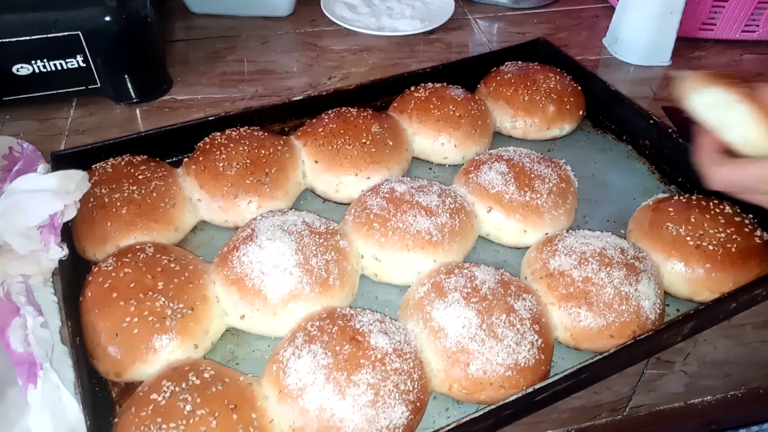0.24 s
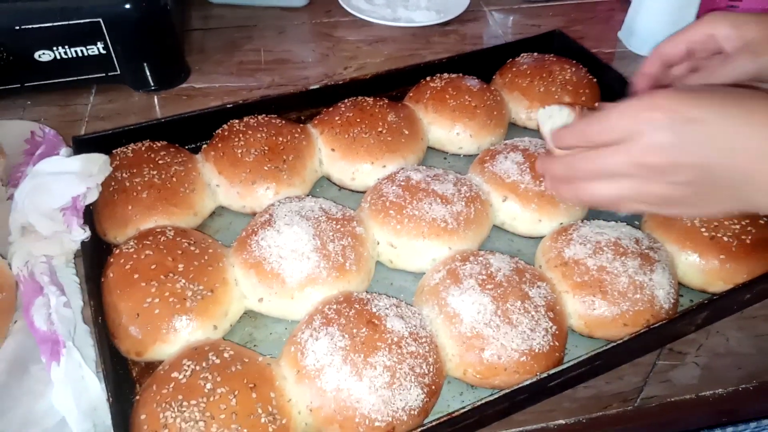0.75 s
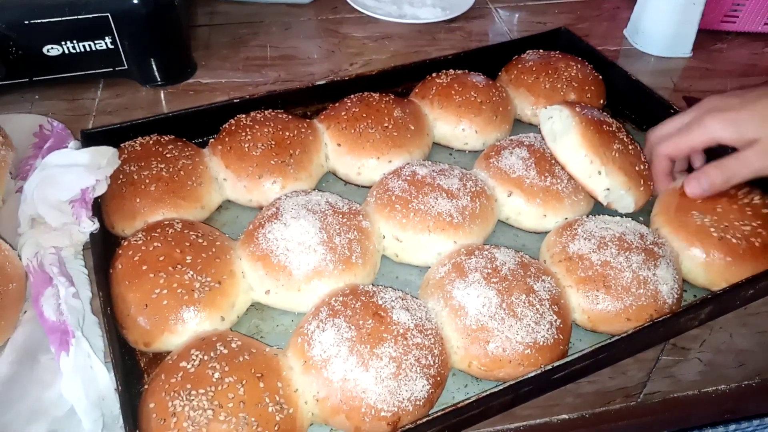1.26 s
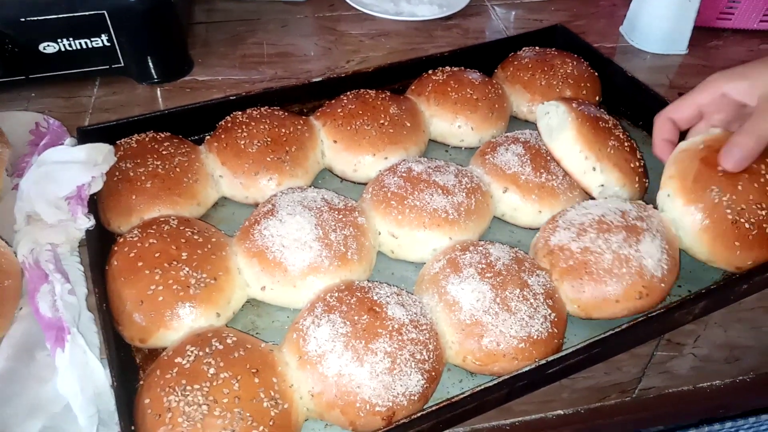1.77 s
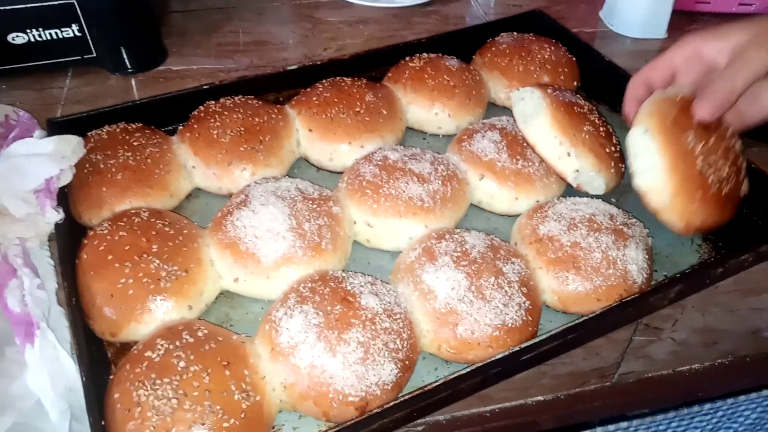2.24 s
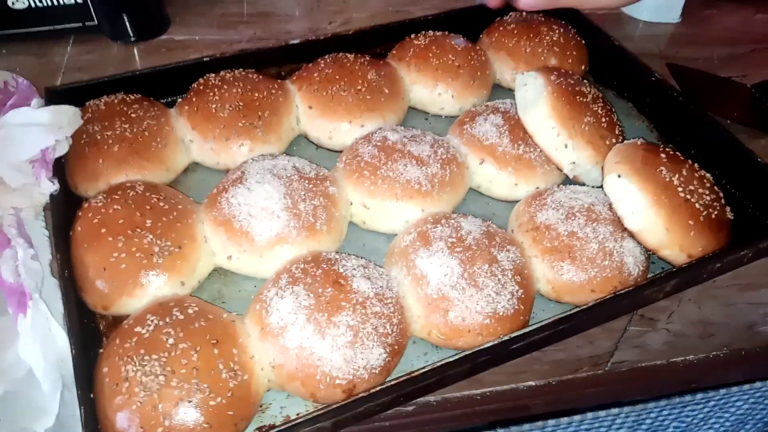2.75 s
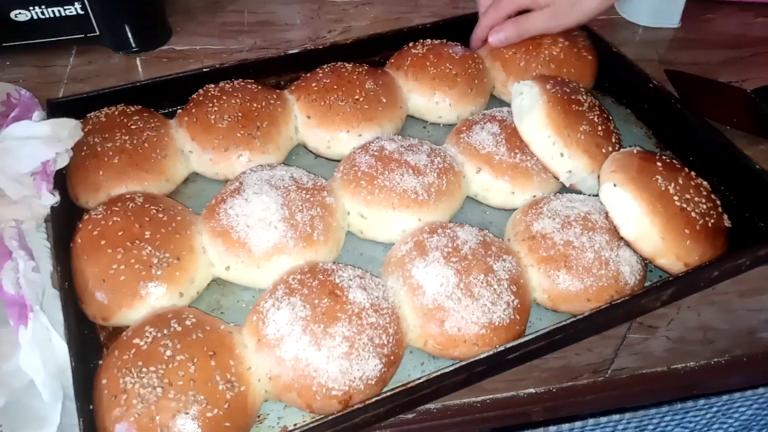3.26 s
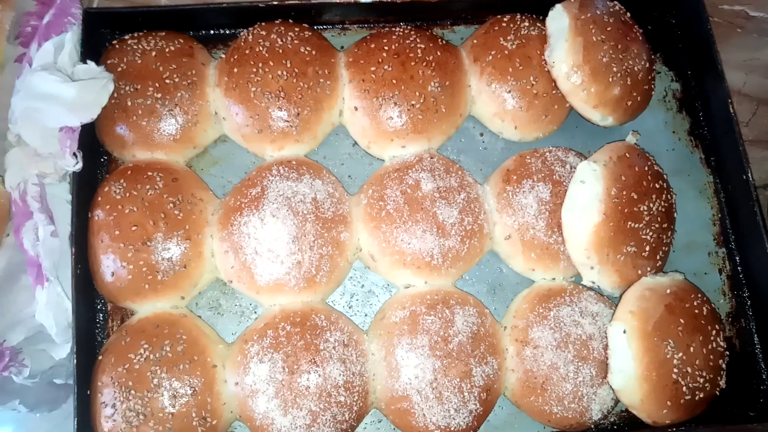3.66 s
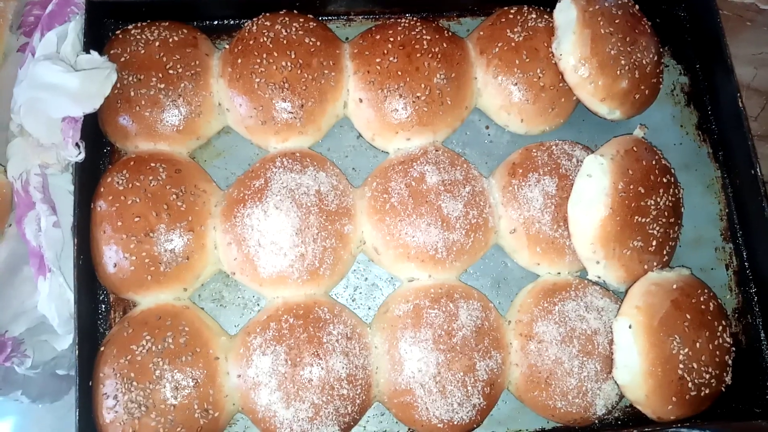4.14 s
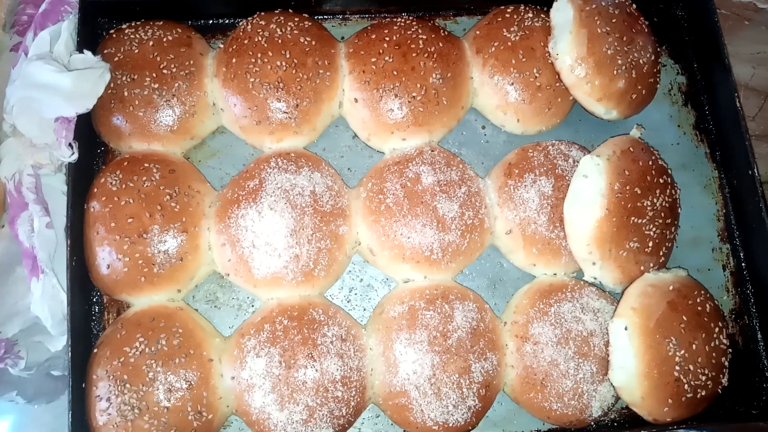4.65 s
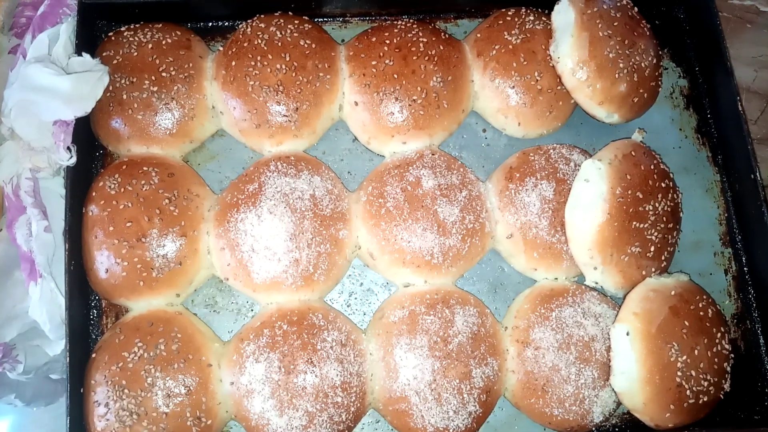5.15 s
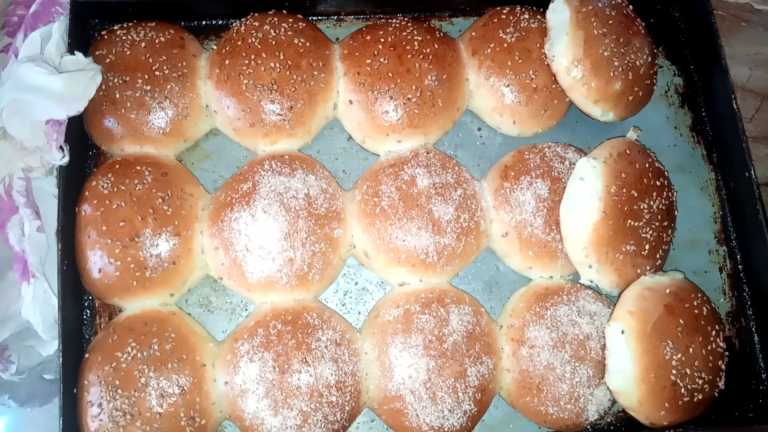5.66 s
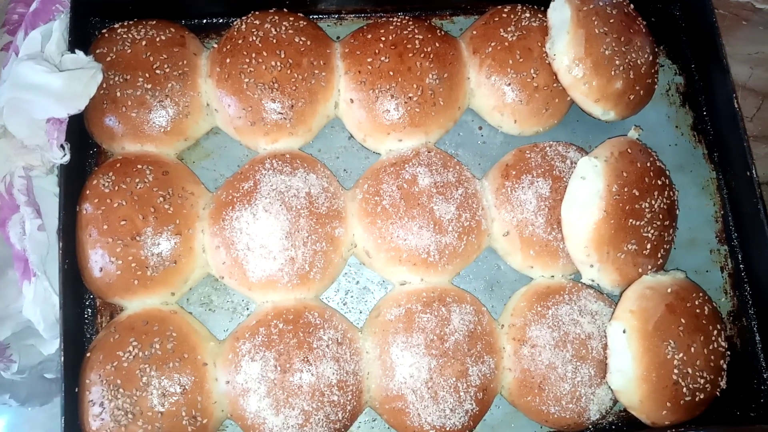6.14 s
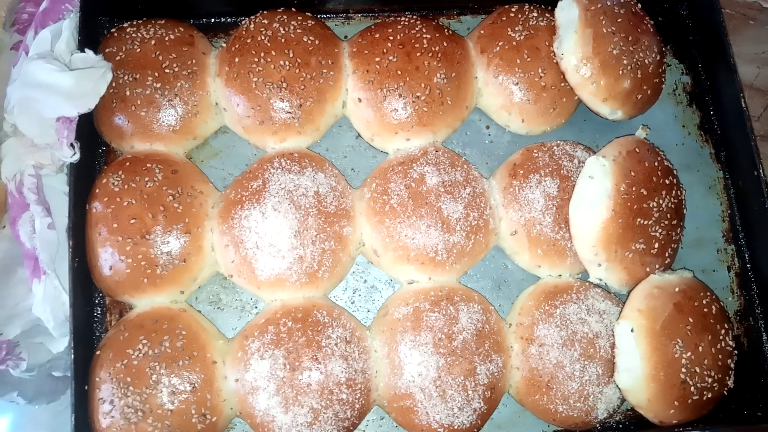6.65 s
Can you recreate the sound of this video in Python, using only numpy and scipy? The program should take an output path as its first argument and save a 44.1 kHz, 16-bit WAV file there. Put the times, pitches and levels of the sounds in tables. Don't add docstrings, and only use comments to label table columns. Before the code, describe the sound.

Close handheld microphone: a burst of bright tray-rim clacks opens, followed by spaced hard knocks, dry crust scrapes, small pings and low worktop thumps over a faint hum and steady insect shimmer. A sparrow warbles. The scene cuts suddenly to a quieter yard with far cheeping, overlapping roosters, faint coos, light air puffs and three clear chirps, all echoing off walls. It cuts back at the very end to a soft boom and warble.

```python
import sys
import numpy as np
from scipy import signal
from scipy.fft import rfft, irfft
from scipy.io import wavfile
from scipy.ndimage import uniform_filter1d

SR = 44100
rng = np.random.default_rng(int(sys.argv[2]) if len(sys.argv) > 2 else 0)


def amplitude_ratio(level_db):
    exponent = np.asarray(level_db, float) / 20
    return 10 ** exponent


def dump(signal):
    limited = np.clip(np.atleast_2d(signal).T, -1, 1)
    pcm = np.round(limited * 32767).astype(np.int16)
    wavfile.write(sys.argv[1], SR, pcm)


N = 304290
TIME = np.arange(N) / SR

CUT_S = (3.358, 6.818)
KITCHEN_SHOT = 1.0 * ((TIME < CUT_S[0]) | (TIME >= CUT_S[1]))
YARD_SHOT = 1 - KITCHEN_SHOT


def unit(x):
    return x / np.sqrt(np.mean(x ** 2))


def band(x, lo_hz, hi_hz, order=2):
    sos = signal.butter(order, [lo_hz, min(hi_hz, SR / 2.1)], "band", fs=SR, output="sos")
    return signal.sosfilt(sos, x)


def hiss(lo_hz, hi_hz, count=N):
    return unit(band(rng.standard_normal(count), lo_hz, hi_hz))


def walk(rate_hz):
    k = int(SR / rate_hz)
    held = np.repeat(rng.standard_normal(N // k + 1), k)
    return unit(uniform_filter1d(uniform_filter1d(held, k), k)[:N])


def tone(hz):
    return np.sin(2 * np.pi * np.cumsum(hz) / SR)


def add(out, s, x):
    i = int(round(s * SR))
    x = x[max(-i, 0):N - i]
    out[max(i, 0):max(i, 0) + len(x)] += x


def tail(t60_s):
    t = TIME[:int(t60_s * SR)]
    x = rng.standard_normal(len(t)) * amplitude_ratio(-60 * t / t60_s)
    return x / np.sqrt(np.sum(x ** 2))


def echo(x, t60_s, wet_db):
    return x + amplitude_ratio(wet_db) * signal.fftconvolve(x, tail(t60_s))[:len(x)]


def swells(table, rise_s, fall_db_s, rest_db=-140):
    gain, t = np.full(N, amplitude_ratio(rest_db)), TIME[:SR]
    for s, hold_s, db in table:
        fall_db = fall_db_s * np.maximum(t - hold_s, 0)
        add(gain, s, np.minimum(t / rise_s, 1) * amplitude_ratio(db - fall_db))
    return gain


def air(spectrum, db):
    edges_hz = (0, 150, 350, 800, 1600, 2800, 5000, 8000, 23000)
    patch_db, patch_per_s = 2.5, 9
    hz, level_db = np.transpose(spectrum)
    f = np.arange(N // 2 + 1) * SR / N + 1
    noise = rfft(rng.standard_normal(N)) * amplitude_ratio(np.interp(np.log(f), np.log(hz), level_db))
    out = np.zeros(N)
    for lo, hi in zip(edges_hz, edges_hz[1:]):
        depth_db = patch_db * (hi < SR / 2)
        out += irfft(noise * (f >= lo) * (f < hi), N) * amplitude_ratio(depth_db * walk(patch_per_s))
    return amplitude_ratio(db) * unit(out)


def cricket():
    note_hz, pulse_hz, kitchen_db, yard_db = 5373, 48.1, -74, -74
    pulse = np.cos(2 * np.pi * np.cumsum(pulse_hz * (1 + 0.019 * walk(12))) / SR)
    note = tone(note_hz * (1 + 0.004 * walk(40)))
    level_db = np.where(KITCHEN_SHOT, kitchen_db, yard_db) + 1.9 * walk(25)
    return amplitude_ratio(level_db) * unit(np.exp(0.6 * pulse) * note)


# (centre [Hz], width [Hz], kitchen level [dB], yard level [dB])
INSECTS = [(3100, 120, -77, -81.5), (3920, 350, -79, -82), (4373, 80, -78, -82.5), (5184, 90, -76.5, -78.5),
           (5360, 200, -81, -86.5), (6600, 61, -90.5, -88.5), (7100, 34, -99, -91.5),
           (7500, 130, -95, -91.5), (9200, 45, -100, -103.5), (10150, 43.4, -103, -99)]


def insects():
    out = np.zeros(N)
    for hz, width_hz, kitchen_db, yard_db in INSECTS:
        level_db = np.where(KITCHEN_SHOT, kitchen_db, yard_db) + 2.0 * walk(13) + 0.78 * walk(1.7)
        out += hiss(hz - width_hz / 2, hz + width_hz / 2) * amplitude_ratio(level_db)
    return out


# (frequency [Hz], density [dB per Hz])
KITCHEN_AIR = [(30, -33.5), (45, -7.5), (65, -19.5), (100, 0.5), (180, -24), (500, -16.5), (900, -23),
               (2500, -22.5), (3000, -14.5), (4600, -17.5), (7400, -26), (8400, -40), (13500, -43),
               (15400, -43.5)]
# (frequency [Hz], density [dB per Hz])
YARD_AIR = [(30, -25), (45, 1), (100, -4.5), (270, -3.5), (600, -4), (900, -28), (2600, -9.5), (3100, 0),
            (4600, -16.5), (5700, -12), (7600, -14.5), (8400, -25), (13500, -29.5), (15400, -32.5)]
# (frequency [Hz], kitchen level [dB], yard level [dB])
HUM = [
    (47.2, -71.5, -92),
    (92.3, -75.5, -84.5),
]


def floor():
    out = KITCHEN_SHOT * air(KITCHEN_AIR, db=-71) + YARD_SHOT * air(YARD_AIR, db=-74)
    out += insects() + cricket()
    for hz, kitchen_db, yard_db in HUM:
        level_db = np.where(KITCHEN_SHOT, kitchen_db, yard_db) + 0.55 * walk(4.7)
        out += amplitude_ratio(level_db) * tone(hz * (1 + 0.0084 * walk(4.7)))
    return out


def whistle(hz, gain, rough, quaver):
    flutter, drift = hiss(30, 290, len(hz)), hiss(30, 290, len(hz))
    phase = 2 * np.pi * np.cumsum(hz * (1 + quaver * drift)) / SR
    return gain * (1 + rough * flutter) * (np.sin(phase) + 0.006 * np.sin(2 * phase))


def lop(shots):
    return shots[np.searchsorted(CUT_S, TIME), np.arange(N)]


# (start [s], start pitch [Hz], top [s], top pitch [Hz], level [dB])
SYLLABLES = [
    (0, 3700, 0.010, 4780, -7),
    (0.047, 3400, 0.055, 4350, 0),
    (0.064, 3050, 0.088, 4000, 1),
    (0.098, 3250, 0.105, 3850, -1),
    (0.114, 2700, .136, 3150, -4),
]


def warble():
    valley_db = -15
    # (time [s], pitch [Hz], level [dB])
    turns = [(0.039, 4300, -1), (0.16, 2250, 2 * valley_db)]
    for start, start_hz, top, top_hz, db in SYLLABLES:
        turns.append((start, start_hz, valley_db if start else 4 * valley_db))
        turns.append((top, top_hz, db))
    return np.transpose(sorted(turns))


# (time [s], level [dB], early-part gain [dB], yard echo [dB], near-wall slap [dB])
WARBLES = [
    (-.057, -39, -1, -9.5, -7.5),
    (2.283, -40, 3.5, -6.5, -8),
    (4.370, -39, -17, -3.5, -13),
    (5.170, -40.5, -6.5, -4, -15.5),
    (6.752, -37.5, -10, -3, -11.5),
]


def warbles():
    shots = np.zeros((3, N))
    turn_s, turn_hz, turn_db = warble()
    t = TIME[:int(turn_s[-1] * SR)]
    hz = uniform_filter1d(np.interp(t, turn_s, turn_hz), size=160)
    lag_s = 0.004 * (t > 0.039)
    shape_db = np.interp(t - lag_s, turn_s, turn_db)
    early = np.clip(1.15 - t / 0.035, 0, 1)
    for s, db, early_db, wet_db, slap_db in WARBLES:
        x = whistle(hz, amplitude_ratio(db + shape_db + early_db * early), rough=0.4, quaver=0.0047)
        x = np.pad(x, (0, 30000))
        x = x + amplitude_ratio(slap_db) * np.roll(x, int(0.035 * SR))
        add(shots[np.searchsorted(CUT_S, s + 0.1)], s, echo(x, 0.57, wet_db))
    return lop(shots)


def crumbs(lo_hz, hi_hz, slip_db):
    ticks_per_s, spread_db = 900, 3.5
    size = amplitude_ratio(spread_db * np.minimum(rng.exponential(size=N), 2) + slip_db)
    ticks = (rng.random(N) < ticks_per_s / SR) * rng.standard_normal(N) * size
    return unit(band(echo(ticks, 0.1, wet_db=3), lo_hz, hi_hz))


# (time [s], hold [s], level [dB], treble [dB])
SCRAPES = [(0.0, 0.01, -47.5, -38.5), (0.382, 0.053, -71, -6.5), (1.021, .2, -60.5, -31),
           (1.294, 0.082, -68.5, -19), (1.399, 0.077, -67.5, -28), (1.501, 0.02, -72, -13),
           (2.379, 0.011, -42.5, -18.5), (2.465, 0.049, -64, -40), (2.813, 0.031, -69.5, -35),
           (2.89, 0.034, -73, -29.5), (3.021, 0.039, -61, -29), (3.143, 0.18, -66.5, -22),
           (3.328, .03, -68.5, -2), (6.813, 0.059, -59, -43)]


def scrapes():
    rise_s, fall_db_s = 0.0067, 260.5
    slip_db = 1.2 * walk(60)
    body = crumbs(1300, 2300, slip_db)
    body += 0.94 * crumbs(1780, 2830, slip_db)
    body += 1.29 * crumbs(3106, 5280, slip_db)
    low, top = crumbs(370, 1100, slip_db), crumbs(5200, 11000, slip_db)
    drag = swells([(s, hold, db) for s, hold, db, _ in SCRAPES], rise_s, fall_db_s)
    grit = swells([(s, hold, db + treble_db) for s, hold, db, treble_db in SCRAPES], rise_s, fall_db_s)
    return drag * (0.48 * body + 0.25 * low) + grit * top


# (time [s], length [s], start pitch [Hz], end pitch [Hz], level [dB])
NOTES = [(4.065, 0.16, 3050, 4100, -58), (4.07, 0.096, 3050, 3300, -61.5), (4.185, 0.07, 4050, 4100, -58.5),
         (5.305, 0.06, 2500, 2050, -70), (.088, 0.011, 6560, 6100, -59), (0.26, 0.021, 3700, 4230, -57),
         (1.462, 0.11, 6300, 5600, -60.5), (3.085, 0.086, 6200, 6000, -60), (4.895, 0.13, 6400, 5600, -60),
         (5.295, 0.099, 4700, 3300, -57.5), (5.26, 0.11, 1200, 1100, -80), (0.84, 0.16, 1900, 2150, -83),
         (5.42, 0.039, 770, 650, -82), (6.70, 0.11, 7000, 5700, -64), (6.76, 0.072, 1400, 1380, -74.5)]
# (time [s], level [dB])
CHIRPS = [
    (5.535, -51.5),
    (5.812, -53.5),
    (6.088, -53),
]
# (delay [s], length [s], start pitch [Hz], end pitch [Hz], level [dB])
CHIRP_PARTS = [
    (0, .04, 3200, 4220, -5.5),
    (.018, .045, 4150, 4436, -3.5),
    (.056, .05, 4050, 3300, -0.5),
]
# (time [s], length [s], start pitch [Hz], end pitch [Hz], level [dB])
FAR_NOTES = [
    (3.33, 0.06, 3920, 3005, -67),
    (3.549, 0.12, 4335, 2647, -65),
    (3.709, 0.071, 4300, 4560, -68),
    (3.723, 0.098, 5880, 6150, -70.5),
    (3.768, 0.088, 7330, 7100, -80.5),
    (3.811, .088, 4240, 2985, -63),
    (3.998, .069, 6520, 5580, -77),
    (5.497, 0.044, 4430, 6030, -81.5),
    (5.782, 0.066, 4455, 5696, -80),
]
# (pitch quaver [0-1], leaf scatter [dB])
BLUR = [
    (.018, 2),
    (.045, 11),
]


def bird_notes():
    yard = np.zeros((3, N))
    near = list(NOTES)
    for s, db in CHIRPS:
        near += [(s + lag, length, a, c, db + part_db) for lag, length, a, c, part_db in CHIRP_PARTS]
    for table, (quaver, leaves_db) in zip((near, FAR_NOTES), BLUR):
        for s, length_s, start_hz, end_hz, db in table:
            u = np.arange(int(length_s * SR)) / (length_s * SR)
            arch = np.sin(np.pi * u)
            hz = (start_hz + (end_hz - start_hz) * u) * (1 + 0.035 * arch)
            x = whistle(hz, amplitude_ratio(db) * arch ** 0.8, 0.42, quaver)
            x = echo(np.pad(x, (0, 5000)), 0.11, leaves_db)
            add(yard[np.searchsorted(CUT_S, s + length_s / 2)], s, x)
    return lop(np.array([echo(shot, 0.87, -5.5) for shot in yard]))


def blows(table, bands, modes, ring_db, crack_db, crack_s, snap_db, late_db, late_t60_s):
    out, t = np.zeros(N), TIME[:30000]
    hz, mode_db, mode_t60 = np.array(modes).T[:, :, None]
    impulse = 1.0 * (t == 0)
    for s, db, a_db, b_db, c_db, t60_s in table:
        chance = rng.standard_normal((2, len(hz), 1))
        fade_db = -60 * t / np.minimum(mode_t60, t60_s)
        ring = amplitude_ratio(ring_db + mode_db + 1.5 * chance[0] + fade_db)
        ring = ring * np.sin(2 * np.pi * hz * (1 + 0.0025 * chance[1]) * t)
        levels_db = (0, a_db, b_db, c_db, c_db - 13)
        for (lo, hi, slow), rel_db in zip(bands, levels_db):
            shape = amplitude_ratio(crack_db) * np.exp(-t / crack_s)
            shape = shape + amplitude_ratio(-60 * t / (t60_s * slow)) + amplitude_ratio(late_db - 60 * t / late_t60_s)
            rattle = shape * unit(band(rng.standard_normal(len(t)), lo, hi, order=3))
            rattle = band(rattle, lo / 1.3, hi * 1.6)
            snap = band(impulse, lo, hi, order=3)
            snap = amplitude_ratio(snap_db - 0.3 * rel_db) * snap / snap.max()
            inside = (hz >= lo) & (hz < hi)
            hit = rattle + snap + (inside * ring).sum(axis=0)
            add(out, s, amplitude_ratio(db - 13.0 + rel_db) * hit)
    return out


# (time [s], peak [dB], low-mid [dB], treble [dB], T60 [s])
CLACKS = [
    (0.1039, -17, -11.5, 0, 0.26),
    (0.108, -30, -20, 2.5, 0.1),
    (0.1150, -28.5, -23, 3, 0.11),
    (0.1420, -19.5, 0.5, -6, 0.21),
    (.1550, -24.5, -7.5, 0, 0.14),
    (2.6221, -57, -20, 3, 0.11),
    (3.358, -47, -9, -10, 0.3),
]
# (frequency [Hz], level [dB], T60 [s])
RIM = [(1079, 1, 0.24), (1250, 3.5, 0.22), (1570, 1, 0.3), (2350, -0.5, 0.2), (2830, 3.5, 0.2),
       (3015, 6, 0.19), (4090, 2, 0.24), (4390, 0, 0.27), (4700, -1, 0.18), (5340, -4, 0.13),
       (5760, -1.5, 0.11), (5830, 0.5, 0.16), (6520, 4, 0.15), (6700, 2.5, 0.15)]


def clacks():
    table = [(s, db, low, top, -11.5 + 1.9 * top, t60) for s, db, low, top, t60 in CLACKS]
    bands = [(3700, 4630, 0.93), (1030, 3900, 1.32), (5210, 7480, 1.01), (7800, 11300, 0.61),
             (12000, 15700, 0.75)]
    out = blows(table, bands, RIM, ring_db=-7.0, crack_db=5.0, crack_s=0.0014, snap_db=11.0,
                late_db=-28.5, late_t60_s=0.51)
    return band(out, 620, 20000)


# (time [s], peak [dB], bass [dB], mid-treble [dB], treble [dB])
KNOCKS = [
    (0.109, -47.5, 4.5, -18.5, -39),
    (0.448, -27, -3.5, -4.5, -21),
    (0.554, -55, 1, 6, -8),
    (1.018, -43.5, 2.5, -1.5, -34),
    (1.409, -52, -24.5, -2, -22),
    (2.055, -31, -2, -13.5, -52),
    (2.390, -26.5, -4, -5.5, -22.5),
    (2.893, -53, -32, -0.5, -27.5),
    (3.014, -41, -12.5, -5.5, -36.5),
]
KNOCK_T60_S = [0.089, 0.23, .07, 0.11, 0.087, 0.18, 0.23, 0.086, 0.18]
# (time [s], peak [dB], bass [dB], mid-treble [dB], treble [dB])
CRUST_SNAPS = [(1.043, -50, -27, -2, -16), (1.075, -56, -30, 2, -17), (1.107, -58.5, -30, 9, -14),
               (1.124, -64, -30, -1, -12), (1.16, -61, -30, 14, -6), (1.19, -65, -30, 8, -5),
               (1.31, -64, -30, 10, -9), (1.51, -66, -30, 11, -6), (.523, -60, -30, 4, -14),
               (.6, -66.5, -30, 7, 0), (2.04, -61, -10, -4, -30), (.905, -62, -29, 1, -19.5),
               (2.379, -52, -13, 4, -24)]
# (frequency [Hz], level [dB], T60 [s])
SHEET = [(376.3, -1, 0.84), (462.5, -7, 0.23), (860, 2.5, 0.14), (1516, 5, 0.26), (1830, 4.5, 0.32),
         (1960, 2, 0.78), (1357, 3, 0.11), (2795, 9, 0.54), (3250, 15.5, 0.12), (3745, 4, 0.59)]


def knocks():
    table = [(*row, t60_s) for row, t60_s in zip(KNOCKS, KNOCK_T60_S)]
    table += [(*row, 0.11) for row in CRUST_SNAPS]
    bands = [(870, 2330, 0.75), (150, 846, 1.09), (2290, 5950, 1.01), (5550, 19000, 0.6)]
    return blows(table, bands, SHEET, ring_db=-16.0, crack_db=2.8, crack_s=0.0027, snap_db=5.5,
                 late_db=-28.0, late_t60_s=0.41)


# (time [s], peak [dB], frequency [Hz], swell [s], T60 [s])
BOOMS = [(0.12, -45.5, 78.2, 0.028, 0.47), (0.458, -40, 79, 0.026, 0.4), (1.022, -49, 344, 0.0094, 0.18),
         (1.182, -57, 92.3, 0.029, 0.31), (1.859, -50.5, 271, 0.03, 0.19), (1.91, -48, 126.6, 0.049, 0.4),
         (2.056, -43.5, 302, 0.0024, 0.14), (2.071, -43.5, 79.3, 0.04, 0.28),
         (2.39, -48, 79.6, 0.028, 0.38), (2.411, -42.5, 144.7, 0.015, 0.25),
         (3.03, -58.5, 150, 0.016, 0.27), (6.817, -52, 98, 0.0062, 0.49)]


def booms():
    out, t = np.zeros(N), TIME[:30000]
    for s, db, hz, swell_s, t60_s in BOOMS:
        gain = amplitude_ratio(db - 60 * t / t60_s) * (1 - np.exp(-t / swell_s))
        add(out, s, gain * np.sin(2 * np.pi * hz * t))
    return out


# (time [s], hold [s], level [dB])
RUMBLE = [
    (.13, 0.053, -60),
    (.45, 0.035, -55),
    (.77, 0.019, -81),
    (1.02, 0.041, -65),
    (1.19, 0.028, -71.5),
    (1.4, 0.03, -72.5),
    (1.85, 0.15, -68),
    (2.055, 0.0092, -52.5),
    (2.385, 0.053, -67),
    (3.02, 0.021, -80),
]


def rumble():
    gain = swells(RUMBLE, rise_s=0.028, fall_db_s=157.5, rest_db=-82)
    return gain * amplitude_ratio(2 * walk(30)) * hiss(109.9, 348)


# (time [s], level [dB], frequency [Hz])
POPS = [(1.074, -52, 2840), (1.10, -53, 1750), (1.311, -60, 1250), (1.412, -60.5, 1316), (1.505, -68, 1205),
        (2.883, -58, 1250), (2.888, -49.5, 1830), (2.888, -48, 3700), (2.89, -56, 2540), (2.925, -60, 1700),
        (3.032, -53, 1610), (3.04, -58, 2110), (2.088, -58, 1900), (1.958, -63, 926), (3.019, -46, 1357),
        (3.026, -48, 433)]


def pops():
    out, t = np.zeros(N), TIME[:5000]
    for s, db, hz in POPS:
        chatter = np.sin(2 * np.pi * hz * t) + 0.65 * hiss(hz / 1.14, hz * 1.1, len(t))
        gain = amplitude_ratio(db - 3.5 - 60 * t / 0.082) * (1 - np.exp(-t / 0.0027))
        add(out, s, gain * chatter)
    return out


# (time [s], hold [s], level [dB])
FLOCK = [
    (3.358, 0.015, -59.5),
    (3.53, 0.066, -63),
    (3.74, 0.15, -67),
    (4.02, 0.026, -78.5),
]


def flock(count=90):
    out, u = np.zeros(N), np.linspace(0, 1, num=3000)
    for when, pitch, size in rng.random((count, 3)):
        hz = (3300 + 3400 * pitch) * (1 - 0.25 * u)
        gain = amplitude_ratio(3.2 * size - 5 * pitch) * np.sin(np.pi * u)
        add(out, 3.25 + 0.9 * when, whistle(hz, gain, rough=0.9, quaver=0.029))
    out = echo(out, 0.7, 6.1)
    loudness = np.sqrt(np.abs(uniform_filter1d(out ** 2, size=6000))) + 1e-6
    return swells(FLOCK, rise_s=0.021, fall_db_s=94) * amplitude_ratio(6.0) * out / loudness


def columns(table):
    s, *cols = np.transpose(table)
    gate = uniform_filter1d(1.0 * ((TIME >= s[0]) & (TIME < s[-1])), size=200)
    return gate, [np.interp(TIME, s, c) for c in cols]


# (time [s], pitch [Hz], effort [dB], beak resonance [Hz])
CROWS = [
    [(3.358, 480.4, -69, 1910), (3.46, 482, -76, 1850), (3.55, 444.3, -75.5, 1640), (3.7, 437.8, -80, 1720),
     (3.88, 442.3, -86, 1800)],
    [(3.64, 490.4, -83, 1600), (3.69, 508.3, -70, 1620), (3.73, 517.6, -76.5, 1570),
     (3.93, 525.6, -76.5, 1570), (4.0, 527, -82, 1690), (4.09, 528, -71.5, 1950), (4.17, 519, -79, 1550),
     (4.33, 523.6, -76.5, 2070)],
    [(4.33, 479.5, -81.5, 1430), (4.45, 478.7, -74, 1610), (4.75, 459.6, -79, 1570),
     (4.92, 434.7, -79, 1930), (5.02, 405, -82.5, 1802), (5.2, 377.3, -93.5, 1544)],
]
# (time [s], pitch [Hz], effort [dB])
FAR_CROWS = [
    [(3.94, 594, -72), (3.97, 590, -64.5), (4.22, 585, -73), (4.3, 567, -79), (4.48, 548, -85.5)],
    [(5.82, 688, -77.5), (5.87, 660, -79), (5.95, 581, -91)],
    [(6.08, 583, -83.5), (6.15, 702, -72.5), (6.22, 697, -69.5), (6.26, 649, -69), (6.45, 647, -74.5),
     (6.64, 630, -90)],
]
# (frequency [Hz], level [dB])
THROAT = [(900, -36), (950, -18.5), (1050, -12), (1300, -4), (1600, -2.5), (2100, -2), (2350, 3),
          (2650, -15)]
# (frequency [Hz], level [dB])
FAR_THROAT = [(1150, -3.5), (1750, -11), (2000, -8), (2200, -6.5), (2400, -18), (2600, -26)]
CHEST_DB = (6, -1, -2)


def roosters():
    head_db_near = (-6, -3, 1)
    breath_db_all = (-4, -7, -14, -14, -12, -14)
    out, hoarse = np.zeros(N), walk(90)
    flicker_db = np.array([1.5 * walk(12) for _ in range(4)])
    rasp = np.array([1 + 0.5 * walk(150) for _ in range(4)])
    breath = hiss(1330, 2480)
    birds = [(table, 0.008, THROAT, 4) for table in CROWS]
    birds += [(table, 0.019, FAR_THROAT, 3) for table in FAR_CROWS]
    weights = zip(birds, tuple(CHEST_DB) + (0, 0, 0), head_db_near + (0, 0, 0), breath_db_all)
    for (table, jitter, throat, count), chest_db, head_db, breath_db in weights:
        gate, curves = columns(table)
        on = gate > 0
        hz, db, *beak = (c[on] for c in curves)
        tiring = 0.84 + 2.43 * np.linspace(0, 1, len(hz)) ** 3
        phase = 2 * np.pi * np.cumsum(hz * (1 + jitter * hoarse[on] * tiring)) / SR
        out[on] += gate[on] * amplitude_ratio(db + breath_db) * breath[on]
        for k in 2 + np.arange(count):
            colour_db = np.interp(k * hz, *np.transpose(throat)) + flicker_db[k - 2, on]
            colour_db += chest_db * (k == 2) + head_db * (k == 5)
            for beak_hz in beak:
                colour_db += 11 / (1 + ((k * hz - beak_hz) / 214) ** 2)
            out[on] += gate[on] * amplitude_ratio(db + colour_db) * rasp[k - 2, on] * np.sin(k * phase)
    return amplitude_ratio(2.5) * echo(out, 0.55, wet_db=6)


# (time [s], hold [s], level [dB])
GUSTS = [
    (3.52, 0.096, -81.5),
    (3.78, 0.18, -75.5),
    (4.56, 0.04, -78.5),
    (5.72, 0.14, -87),
    (6.48, 0.072, -77),
    (6.815, 0.1, -61),
]


def gusts():
    gain = swells(GUSTS, rise_s=0.01, fall_db_s=126, rest_db=-97)
    return gain * amplitude_ratio(1.9 * walk(21)) * hiss(37, 210)


# (time [s], hold [s], level [dB])
COOS = [
    (3.598, .1, -76),
    (4.03, 0.17, -77.5),
    (4.389, 0.15, -75),
    (4.778, 0.049, -74.5),
    (5.517, 0.074, -80),
    (5.814, 0.089, -75),
    (6.176, 0.17, -75),
    (6.62, 0.074, -74.5),
]
# (time [s], hold [s], level [dB])
LOW_COOS = [
    (3.85, 0.06, -79.5),
    (4.4, 0.16, -72),
    (5.7, 0.22, -81),
    (6.33, 0.23, -78),
]


def dove():
    out = np.zeros(N)
    phase = 2 * np.pi * np.cumsum(262 * (1 + 0.045 * walk(22))) / SR
    for partial, coos in ((1, LOW_COOS), (2, COOS)):
        gain = swells(coos, rise_s=0.0072, fall_db_s=219) * amplitude_ratio(5 * walk(30))
        out += gain * np.sin(partial * phase)
    return out


# (time [s], hold [s], level [dB])
CLUCKS = [
    (3.75, 0.15, -87),
    (5.82, 0.36, -83.5),
    (6.42, 0.06, -92),
]


def yard_stir():
    out = np.zeros(N)
    stir = swells(CLUCKS, rise_s=0.047, fall_db_s=68, rest_db=-89)
    for hz in 650 * 1.267 ** np.arange(6):
        out += stir * amplitude_ratio(-6 + 3.1 * walk(12)) * hiss(hz / 1.15, hz * 1.254)
    return out


def scene():
    tray = clacks() + knocks() + booms() + pops()
    kitchen = KITCHEN_SHOT * (scrapes() + rumble()) + tray
    fowl = YARD_SHOT * (roosters() + dove() + yard_stir())
    return (floor() + warbles() + bird_notes() + kitchen + flock() + fowl + gusts())[None]


def low_pass(x):
    return signal.sosfilt(signal.butter(12, 15900, fs=SR, output="sos"), x)


def record(dry):
    mix = dry + amplitude_ratio(6.0) * band(dry, 13970, 16940)
    return low_pass(mix)


dry = scene()
out = record(dry)
dump(out)
```